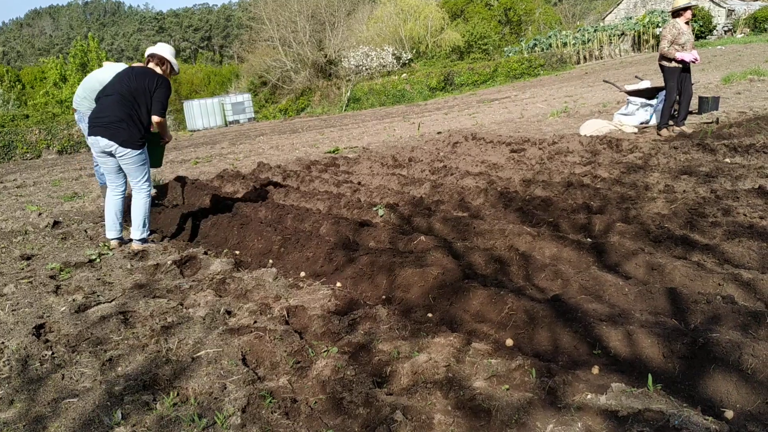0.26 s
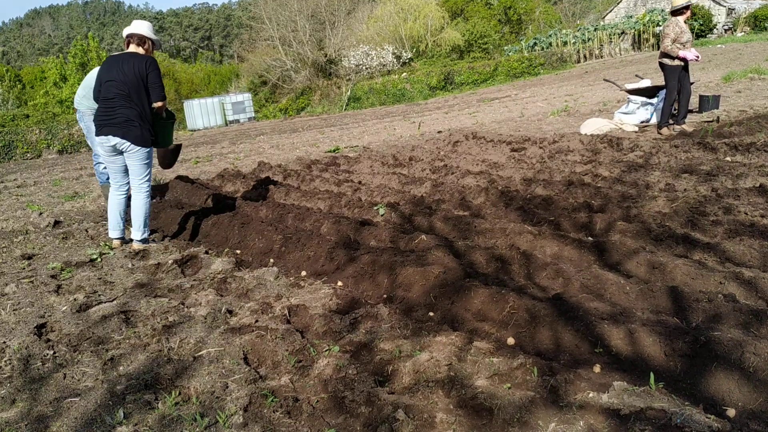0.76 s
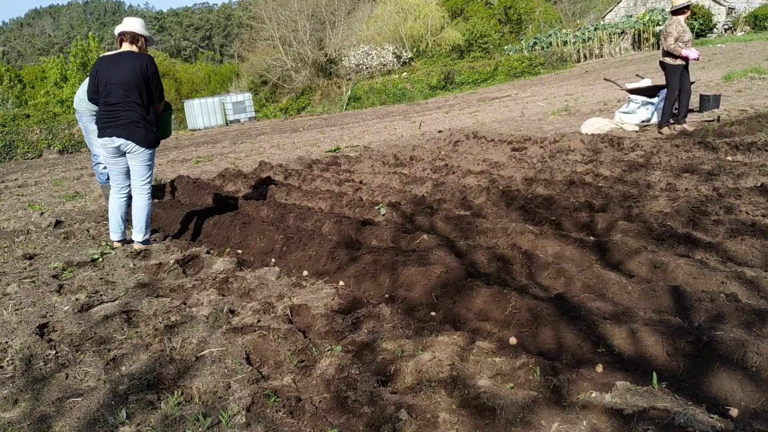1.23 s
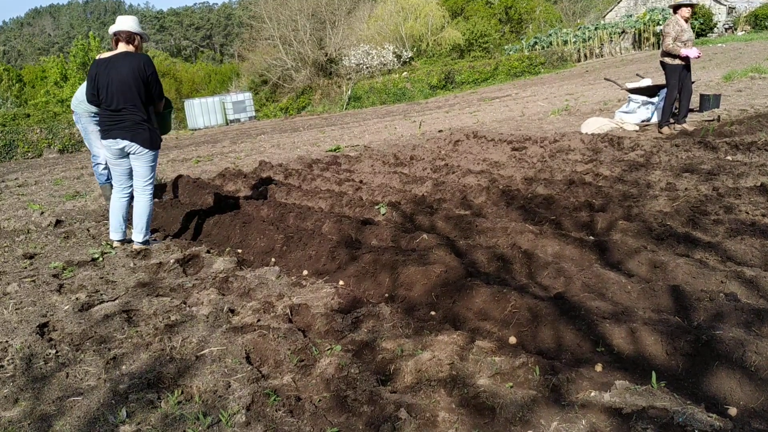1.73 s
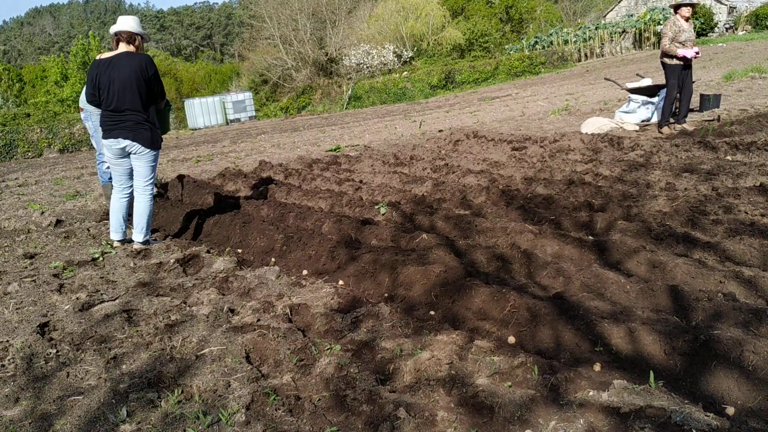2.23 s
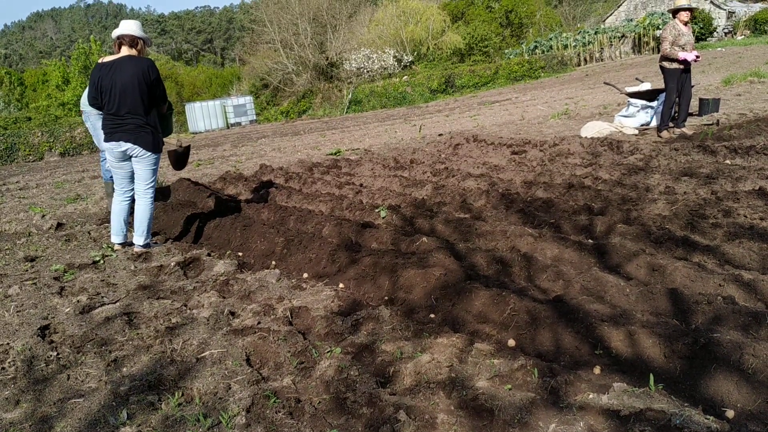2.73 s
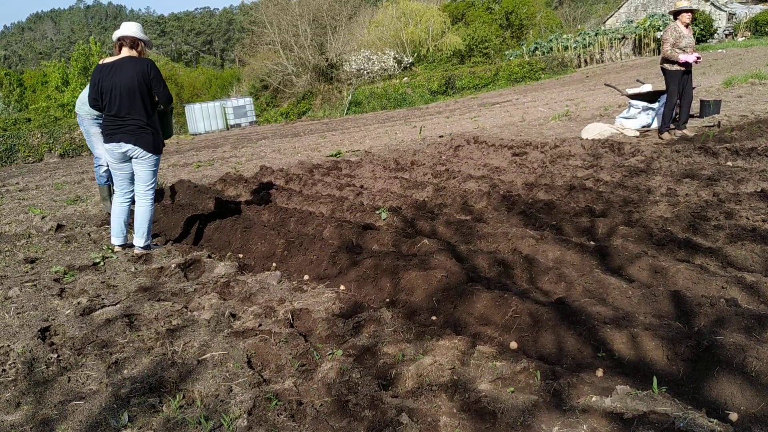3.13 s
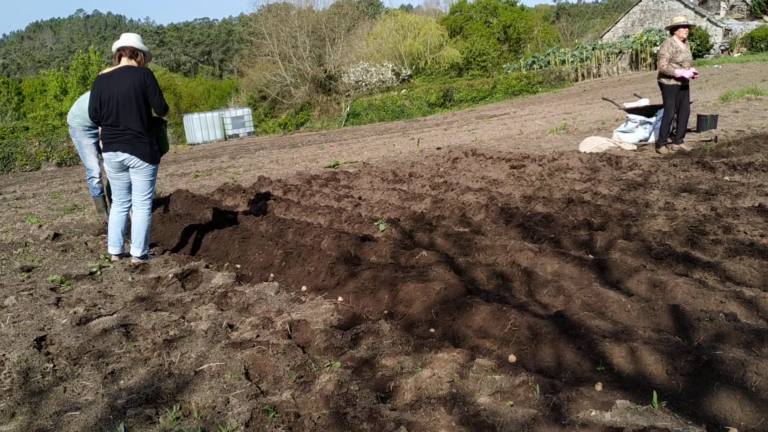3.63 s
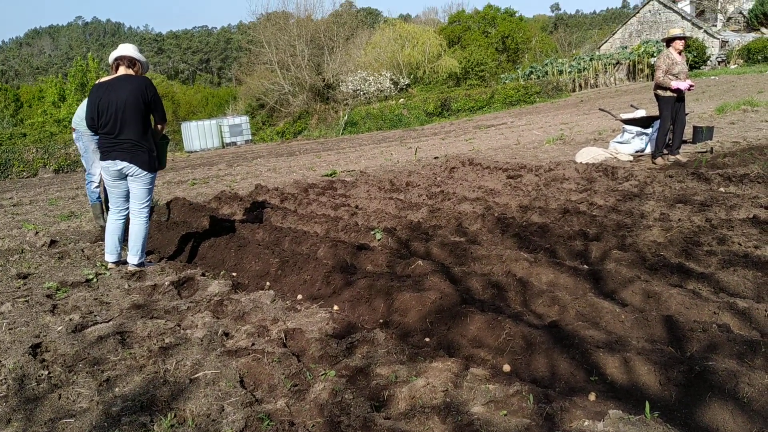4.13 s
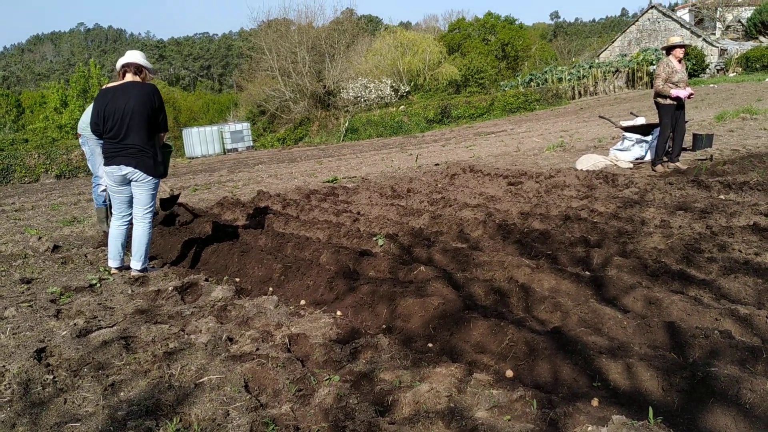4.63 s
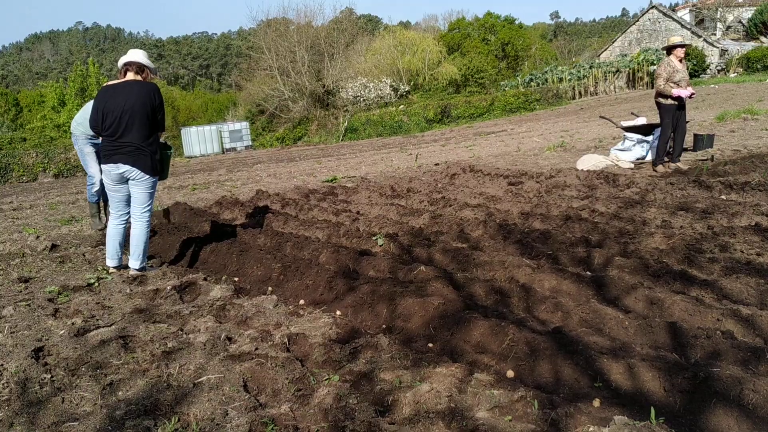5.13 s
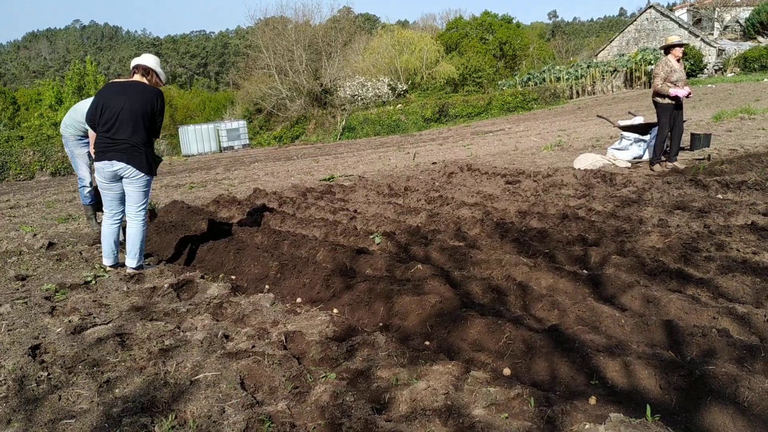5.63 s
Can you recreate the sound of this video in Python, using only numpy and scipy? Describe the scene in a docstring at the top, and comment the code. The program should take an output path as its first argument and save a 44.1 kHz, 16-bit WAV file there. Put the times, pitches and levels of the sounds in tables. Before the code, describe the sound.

Open farmland recorded on a phone with mismatched microphones: the left dull and shaded, the right bright and ringing. From the start a distant heavy diesel hums at about 80 hertz, gradually rising to 85, passing from right to left. Its deep boom is strongest in the first two seconds, dips near 2.5, partly returns, then flutters weaker toward the end. A puffing roar grows from about 1.7 seconds, with a thin panel rattle early and dull single knocks from 1.4 to 4.3. A nearby shovel enters the soil softly at 0.1, with a sharp crack and grit at 1.2, a ringing scrape at 3.2, and another bite with a short metal ping at 5.2. Leaves hiss steadily. Low wind presses on the microphones, gusting near 2.3 and most strongly around 4.5 with soft pops, and one more pop at 5.6. Very faint far bird whistles appear around 2 to 2.7 and after 5.4.

```python
"""Across an open field a six-cylinder diesel passes from right to left, far off: exhaust tones boom on the firing
rate, upper noise bursts with each firing, a loose panel rattles. Leaves hiss and wind buffets from the start; at
0.1 s a shovel first bites the soil nearby, in grit and blade modes, and again at 1.2, 3.2 and 5.2 s. Single
firings knock from 1.4 s, gliding sines make far birds from 1.9 s, wind pops follow from 4.4 s. A phone hears it
with two unlike microphone ports: the right one rings in the treble, the left one is shaded and dull."""
import sys
import numpy as np
from scipy import signal
from scipy.fft import rfft, irfft, next_fast_len
from scipy.io import wavfile
from scipy.ndimage import uniform_filter1d, map_coordinates

SR = 44100
rng = np.random.default_rng(int(sys.argv[2]) if len(sys.argv) > 2 else 0)


def unload_wav(signal):
    """Save mono or channel-first audio to the path in sys.argv[1] as 16-bit WAV at rate SR, clipped to [-1, 1]."""
    wavfile.write(
        sys.argv[1],
        SR,
        np.round(np.clip(np.atleast_2d(signal).T, -1, 1) * 32767).astype(np.int16),
    )


N = 258867
TIME = np.arange(N) / SR  # s
# resonances of the loose panel: (frequency [Hz], width [Hz], level [dB])
PANEL_MODES = [(2650, 350, -3), (3740, 500, 0), (6250, 800, -3.5), (7760, 790, -8.5)]
NEAR_LAG_MS = 0.26  # sounds from the right port's side reach the left port this much later


def amp(db):
    """dB to gain."""
    return 10 ** (np.asarray(db) / 20)


def unit(x):
    """Scaled to rms 1."""
    return x / np.sqrt(np.mean(x ** 2, axis=-1, keepdims=True) + 1e-20)


def along(points, hz):
    """Interpolates (Hz, value) points on a log frequency axis."""
    f, v = np.transpose(points)
    return np.interp(np.log(hz + 1), np.log(f + 1), v)


def curves(rows):
    """One value per sample for each column after the time."""
    s, *columns = np.transpose(rows)
    return [np.interp(TIME, s, column) for column in columns]


def wobble(rate):
    """A smooth random curve, rate knots a second."""
    coarse = TIME[::64]
    knots = rng.standard_normal(int(N * rate / SR) + 4)
    return np.interp(TIME, coarse, map_coordinates(knots, [coarse * rate]))


def filtered(x, response):
    """x times a response of frequency."""
    m = next_fast_len(N + 8192)
    return irfft(rfft(x, m) * response(np.fft.rfftfreq(m, 1 / SR)), m)[..., :N]


def rush(spectrum, patchy_db, channels):
    """Independent shaped noises of rms 1; if patchy, they share patches of random gain in time and frequency."""
    noise = rng.standard_normal((channels, N + 512))
    if patchy_db:
        z = signal.stft(noise, nperseg=512)[2]
        field = uniform_filter1d(rng.standard_normal(z.shape[1:]), size=5, axis=0)
        field = uniform_filter1d(field, size=10, axis=1)
        noise = signal.istft(z * amp(patchy_db * field / field.std()), nperseg=512)[1]
    return unit(filtered(noise[:, :N], lambda hz: amp(along(spectrum, hz))))


def crossfaded(x, edges_hz, levels_db):
    """Splits x at the edges and plays each band, at rms 1, along its own level curve."""
    under = [filtered(x, lambda hz: 1 / (1 + (hz / edge) ** 6)) for edge in edges_hz] + [x]
    return sum(amp(db) * unit(whole - lower) for db, whole, lower in zip(levels_db, under, [0] + under))


def ringing(x, modes):
    """x through resonances of (Hz, width Hz, dB) with alternating sign, at rms 1."""
    def response(f):
        return sum((-1) ** k * amp(db) * 1j * f * width / (centre ** 2 - f * f + 1j * f * width)
                   for k, (centre, width, db) in enumerate(modes))
    return unit(filtered(x, response))


def struck(db, hz, t60):
    """A sine that starts within about a millisecond and decays by 60 dB in t60 seconds."""
    t = TIME[:SR // 2]
    return amp(db - 60 * t / t60) * (1 - np.exp(-t / 0.0011)) * np.sin(2 * np.pi * hz * t)


def heard(x, lag_ms):
    """One sound at both ports, the left one late by lag_ms."""
    return np.array([map_coordinates(x, [(TIME - lag_ms / 1000) * SR], mode="nearest"), x])


def add(track, s, sound):
    """Lays a short sound on a track at s seconds."""
    part = track[..., round(s * SR):][..., :sound.shape[-1]]
    part += sound[..., :part.shape[-1]]


def engine():
    """Its tones, bark, clatter and upper roar follow one count of firings; knocks come at their own times."""
    # engine speed: (time [s], firing rate [Hz])
    firing_rate = [(0.0, 80.51), (0.33, 80.76), (0.65, 79.18), (0.98, 79.78), (1.3, 80.59), (1.63, 80.86),
                   (1.96, 81.06), (2.28, 81.14), (2.61, 81.01), (2.94, 80.97), (3.26, 81.43), (3.59, 81.13),
                   (3.91, 82.72), (4.24, 82.86), (4.57, 83.04), (4.89, 83.8), (5.22, 85.16), (5.54, 84.51),
                   (5.87, 85.15)]
    # passage from right to left: (time [s], lag of the left port behind the right [ms])
    bearing = [(0, 0.39), (1.499, 0.21), (3, -0.044), (4.199, -0.15), (5.87, -0.3)]
    hunt_hz = 0.12  # scale of the random wander in firing rate
    start_turn, burst_lead = 0.36, 0.12  # in firings
    firing_hz, lag_ms = curves(firing_rate)[0], curves(bearing)[0]
    firings = np.cumsum(firing_hz + hunt_hz * wobble(6)) / SR + start_turn
    turn = 2 * np.pi * firings
    bursts = firings + burst_lead
    count, phase = bursts.astype(int), bursts % 1
    every_other = np.cos(np.pi * count)
    # some firings are much harder than others
    strength = amp(1.6 * rng.standard_normal(1000)[count] + 2.1 * every_other + 1.6 * np.cos(turn / 6))
    direct = np.sqrt(2) * exhaust_tones(turn) + pipe_bark(strength, phase)
    direct += panel_clatter(count, every_other, phase) + loud_firings()
    return heard(direct, lag_ms) + exhaust_roar(strength, phase, lag_ms)


def exhaust_tones(turn):
    """Harmonics of the firing rate, and weaker orders in sixths of it because the cylinders are uneven."""
    # firing-rate boom: (time [s], level [dB])
    boom = [(0.1, -17.5), (0.85, -17), (1.02, -15), (1.78, -16.5), (1.86, -18.5), (2.13, -18.5),
            (2.4, -25.5), (2.46, -29), (2.78, -21.5), (3.15, -22), (3.39, -20), (3.86, -18.5),
            (4.62, -22.5), (4.74, -25.5), (4.81, -24), (4.93, -26), (5.16, -21.5), (5.3, -22), (5.49, -24),
            (5.538, -29.5), (5.566, -21.5), (5.596, -27.5), (5.64, -26), (5.738, -24.5), (5.77, -29),
            (5.8, -23.5), (5.836, -31.5), (5.87, -26)]
    # second harmonic before its waver: (time [s], level [dB])
    second = [(0, -55), (1.0, -53.5), (1.5, -46.5), (2.0, -51.5), (2.4, -41), (2.66, -34.5), (2.9, -41),
              (3.05, -32), (3.35, -34), (3.55, -38), (3.62, -49), (3.77, -38), (3.86, -45), (3.92, -35),
              (4.3, -35.5), (4.72, -33.5), (4.82, -39), (5.05, -43.5), (5.25, -41.5), (5.45, -40.5),
              (5.55, -50), (5.73, -37), (5.87, -45)]
    # higher harmonics before their waver: (time [s], third harmonic [dB], seventh harmonic [dB])
    third_seventh = [(0, -56, -52), (1.0, -51, -52.5), (1.7, -54.5, -60), (2.7, -47, -55.5),
                     (3.4, -49.5, -51.5), (4.1, -54, -57), (5.2, -58, -63), (5.87, -53, -66)]
    # uneven cylinders: (multiple of a sixth of the firing rate [1], level before swells [dB],
    # strongest time [s], distance from it in time to 6 dB down [s])
    uneven = [(3.04, -44, 3.8, 3.5), (3.96, -48.5, 4.5, 5), (4.99, -44.5, 3.1, 2.5), (7.01, -49, 4, 1),
              (8.965, -44.5, 2.8, 3), (9.96, -47, 5, 4.5), (11.08, -50, 4.6, 4.5), (14, -49, 5.5, 1.3),
              (15, -51.5, 3.6, 2), (25.94, -52, 5.36, 0.4), (27.97, -50, 4.15, 1.5),
              (29.8, -52.5, 5.03, 0.4), (33.97, -55.5, 3.3, 2.5), (35.9, -59, 3.4, 1.5),
              (48, -59.5, 3.9, 0.5), (58, -59.5, 2.8, 1)]
    waver_db, swell_db = 2, 2.5
    blur_rad = 0.046  # scale of the phase wander, per multiple
    overtones_db = [db + waver_db * wobble(9) for db in curves(second) + curves(third_seventh)]
    levels_db = curves(boom) + overtones_db
    tones = sum(amp(db) * np.cos(k * turn) for k, db in zip((1, 2, 3, 7), levels_db))
    for k, db, s, far_s in uneven:
        level_db = db - 6 * ((TIME - s) / far_s) ** 2 + swell_db * wobble(2.95)
        angle = k * (turn / 6 + blur_rad * wobble(12)) + rng.uniform(0, 2 * np.pi)
        tones += amp(level_db) * np.cos(angle)
    return tones


def exhaust_roar(strength, phase, lag_ms):
    """Broad noise whose upper part puffs with each firing and arrives partly scattered at the ports."""
    # roar before its bands are levelled: (frequency [Hz], relative density [dB])
    spectrum = [(40, -120), (60, -10), (95, -7), (130, 4.5), (200, -2), (260, -12), (320, -15.5),
                (385, -17), (480, -15), (620, -18), (790, -13.5), (950, -17.5), (1450, -19.5), (2000, -29),
                (4000, -42), (7000, -120)]
    # low end of the roar: (time [s], rumble [dB], pipe resonance [dB])
    low_end = [(0, -51, -50.5), (.8, -53, -48.5), (1.3, -45, -49), (1.7, -39.5, -50.5), (2.4, -48, -48.5),
               (3.2, -41.5, -47), (4, -44, -48.5), (4.8, -41.5, -49.5), (5.3, -44, -48), (5.87, -42, -40)]
    # upper roar along the pass: (time [s], body [dB], bright part [dB])
    passing = [(0.0, -48, -54), (0.3, -45, -49), (0.85, -50.5, -53.5), (1.2, -44.5, -52), (1.68, -44, -52),
               (1.76, -40, -49), (1.93, -42, -46.5), (2.65, -42.5, -51), (2.89, -42, -46.5),
               (3.3, -46.5, -50), (3.65, -43, -48.5), (4.07, -39.5, -46), (4.23, -43, -44),
               (4.5, -40.5, -47), (4.68, -44.5, -47.5), (5.0, -44.5, -52), (5.33, -43, -47.5),
               (5.87, -47.5, -52)]
    puffs = unit(uniform_filter1d(1.4 + strength * np.exp(-phase / 0.59), size=40))
    direct, *scattered = rush(spectrum, patchy_db=1.0, channels=3)

    def share(hz):
        """Trees and ground scatter the shorter waves, so they differ from port to port."""
        return np.clip(along([(200, 0.12), (600, 0.3), (1500, 0.74), (3000, 0.64)], hz), 0, .8)

    upper = filtered(direct, lambda hz: 1 / (1 + (440 / (hz + 1)) ** 6))
    direct = direct - upper + puffs * upper  # the low end does not puff
    sound = heard(filtered(direct, lambda hz: np.sqrt(1 - share(hz) ** 2)), lag_ms)
    sound += filtered(np.array(scattered), share)
    return crossfaded(sound, [270, 440, 1100], curves(low_end) + curves(passing))


def firing_spray(phase, decay):
    """A burst of noise at each firing, decaying over a fraction of the firing interval."""
    return rng.standard_normal(N) * np.exp(-phase / decay)


def pipe_bark(strength, phase):
    """Each firing's noise burst rings in the resonances of the exhaust pipe."""
    # bark: (time [s], level [dB])
    bark = [(0, -56), (1.1, -55.5), (1.75, -45), (2.2, -48.5), (2.5, -51.5), (2.9, -46.5), (3.3, -55),
            (4.1, -49), (4.7, -62), (5.87, -62)]
    # pipe resonances: (frequency [Hz], width [Hz], level [dB])
    pipe_modes = [(520, 180, -6), (792, 250, 0.5), (1080, 450, -1.5), (1590, 400, -8.5)]
    return amp(curves(bark)[0]) * ringing(strength * firing_spray(phase, decay=0.16), pipe_modes)


def panel_clatter(count, every_other, phase):
    """Each firing shakes the loose panel, whose resonances ring on a noise burst."""
    # clatter: (time [s], level [dB])
    clatter = [(0, -58), (.5, -57.5), (1.1, -60.5), (1.4, -55.5), (1.6, -49.5), (1.8, -57.5), (2.3, -59.5),
               (3, -70), (5.87, -78)]
    shakes = amp(2.4 * rng.standard_normal(1000)[count] + 3.2 * every_other)
    return amp(curves(clatter)[0]) * ringing(shakes * firing_spray(phase, decay=0.15), PANEL_MODES)


def leaves():
    """Leaves hiss all around: patchy noise, partly shared by the ports and partly separate at each."""
    # leaf noise before its bands are levelled: (frequency [Hz], relative density [dB])
    spectrum = [(500, -120), (900, -9), (2000, 2.5), (4000, -8), (8000, -7), (12000, -14), (16000, -14.5)]
    # leaf level: (time [s], hiss [dB], its finest part [dB])
    hiss_level = [(0.0, -47.5, -54.5), (0.88, -50.5, -56), (1.6, -47.5, -53.5), (3.22, -50.5, -60),
                  (4.2, -51, -57), (4.66, -49.5, -51.5), (5.87, -52.5, -53)]
    near, *around = rush(spectrum, patchy_db=1.84, channels=3)
    hiss = amp(0.53 * wobble(9)) * (0.67 * heard(near, NEAR_LAG_MS) + np.array(around))
    return crossfaded(hiss, [6800], curves(hiss_level))


def wind_buffet():
    """A steady breeze and gusts press low noise on the microphone ports, more on the left one."""
    # buffet noise: (frequency [Hz], relative density [dB])
    spectrum = [(3, -19.5), (10, 4), (16, 2), (24, -14), (31, -8), (45, -8), (70, -8.5), (200, -38),
                (500, -49), (1000, -120)]
    # gusts: (strongest time [s], gain added to the breeze [dB], time from there to 1/e [s])
    gusts = [(2.3, -37, 0.16), (3.1, -46, 0.43), (4.495, -29, 0.21), (5.75, -42, 0.34)]
    breeze_db = -35.5
    gain = amp(breeze_db) + sum(amp(db) * np.exp(-((TIME - s) / half_s) ** 2) for s, db, half_s in gusts)
    both, left, right = rush(spectrum, patchy_db=None, channels=3)
    return gain * np.array([both + amp(2.5) * left, both + amp(-24.0) * right])


def panel_ticks():
    """Lone ticks of the panel: its modes, slightly detuned, die away in milliseconds."""
    # ticks: (time [s], level before the mode levels [dB])
    ticks = [(0.021, -41), (.032, -39.5), (.44, -42), (.6935, -39.5), (0.769, -39.5)]
    out, t = np.zeros(N), TIME[:SR // 2]
    for s, db in ticks:
        ring = sum(amp(level) * np.sin(2 * np.pi * hz * (1 + .03 * rng.normal()) * t)
                   for hz, _, level in PANEL_MODES)
        add(out, s, amp(db - 60 * t / 0.012) * ring)
    return out


def shovel():
    """The edge cracks, spiky grit sings in the blade's high modes, and a thud rings in its low ones."""
    # strokes in the soil: (time [s], level [dB], edge crack [dB], rise constant [ms], grit decay [ms],
    # grit from [Hz], grit to [Hz], thud [dB], ring [dB], sings most near [Hz], and near [Hz]);
    # crack, thud and ring are relative to the level
    strokes = [(.096, -44, -17, 3, 45, 1200, 3800, -6, -13, 3300, 6000),
               (1.1999, -34, 18, 1.1, 6.4, 3280, 15000, 6, 0, 6010, 4800),
               (1.223, -46, 7, .4, 2.5, 4940, 8300, 9, 2.5, 6850, 6850),
               (3.1902, -37.5, -5, 2.1, 6.4, 1500, 14000, -5, 4, 3620, 7500),
               (5.158, -41, -20, 4, 18, 600, 2200, -6, -20, 3300, 3300),
               (5.239, -35, 10, 1.1, 6.2, 3580, 14500, -18, 1, 6950, 3880)]
    # low blade modes: (frequency [Hz], level before random variation [dB], 60 dB decay [s])
    low_modes = [(348, -1, 0.075), (690, -2.5, 0.058), (1087, -0.5, 0.074), (1330, -1.5, 0.079),
                 (1590, -2.5, 0.045), (2000, -7, 0.06)]
    # high blade modes: frequency [Hz]
    high_modes = [3320, 3630, 4100, 4870, 5940, 6930, 7450, 8360, 10100, 11850]
    sing_falls_db_per_octave = 40
    crack_hz, crack_ms = 7300, 0.34
    out, t = np.zeros(N), TIME[:SR // 6]
    ms = t * 1000
    for s, db, crack_db, rise_ms, grit_ms, low_hz, high_hz, thud_db, ring_db, *near_hz in strokes:
        spikes = amp(2 * rng.standard_normal(len(t) // 32 + 1)).repeat(32)[:len(t)]
        grit = rng.standard_normal(len(t)) * spikes
        band = signal.butter(2, [low_hz, high_hz], "bandpass", fs=SR)
        grit = unit(signal.lfilter(*band, grit))
        ring = np.zeros(len(t))
        for hz in high_modes:
            octaves_off = np.abs(np.log2(hz / np.array(near_hz))).min()
            ring += amp(-sing_falls_db_per_octave * octaves_off) * np.sin(2 * np.pi * (hz * t + rng.uniform()))
        spread = ms / grit_ms
        bite = np.exp(-spread ** 2) * (grit + amp(ring_db) * unit(ring))
        crumbs = 0.44 * np.exp(-spread / 3) * grit  # they trickle on after the bite
        thud = sum(amp(level + rng.normal(0, 1.4) - 60 * t / t60)
                   * np.sin(2 * np.pi * hz * t + rng.uniform(0, 2 * np.pi)) for hz, level, t60 in low_modes)
        crack = amp(crack_db) * np.exp(-ms / crack_ms) * np.sin(2 * np.pi * crack_hz * t)
        rise = 1 - np.exp(-ms / rise_ms)
        add(out, s, amp(db) * (crack + rise * (bite + crumbs + amp(thud_db) * thud)))
    return out


def metal_pings():
    """Thin metal pings, each a single decaying mode."""
    # pings: (time [s], level before onset and decay [dB], frequency [Hz], 60 dB decay [s])
    pings = [(0.105, -48, 5970, 0.36), (2.532, -43, 3660, 0.19), (5.181, -32.5, 1033, 0.19)]
    out = np.zeros(N)
    for s, db, hz, t60 in pings:
        add(out, s, struck(db, hz, t60))
    return out


def loud_firings():
    """Single loud firings knock, each a brief decaying sine at its own listed time."""
    # knocks: (time [s], level before onset and decay [dB], frequency [Hz])
    knocks = [(1.422, -34, 672.8), (1.738, -29, 760), (1.816, -30, 790), (1.864, -29, 920),
              (1.902, -30, 790), (1.939, -31, 1150), (1.964, -31, 950), (2.087, -26.5, 926),
              (2.677, -30, 930), (2.805, -28, 834), (2.902, -26, 727), (3.1225, -26, 790), (3.9, -31, 1250),
              (4.151, -25, 670), (4.316, -32, 690)]
    out = np.zeros(N)
    for s, db, hz in knocks:
        add(out, s, struck(db, hz, t60=0.035))
    return out


def birds():
    """Thin far whistles: faint sines that glide a little under a smooth swell."""
    # whistles: (start [s], end [s], from [Hz], to [Hz], level [dB])
    whistles = [(1.868, 1.94, 6770, 6920, -54), (2.16, 2.241, 6130, 5930, -57),
                (2.632, 2.7, 2590, 2600, -53), (2.62, 2.66, 4150, 4130, -56), (5.47, 5.53, 4180, 4130, -59),
                (5.537, 5.618, 4220, 4150, -61), (5.42, 5.538, 5150, 5020, -60),
                (5.74, 5.92, 5150, 5050, -56.5)]
    out = np.zeros(N)
    for start, end, from_hz, to_hz, db in whistles:
        hz = np.linspace(from_hz, to_hz, round((end - start) * SR))
        swell = np.sqrt(np.hanning(len(hz)))
        add(out, start, amp(db) * swell * np.sin(2 * np.pi * np.cumsum(hz) / SR))
    return out


def wind_pops():
    """Wind pops on the ports: a pressure step that swings back, with noise on its edge and a thin hiss."""
    # pops: (time [s], mean level of the ports [dB], left minus right [dB])
    pops = [(4.372, -29.5, -2), (4.394, -38, -10), (4.48, -26.5, 22.5), (4.528, -27, 15.5),
            (5.626, -34, -1.5)]
    out, t = np.zeros((2, N)), TIME[:SR // 20]
    for s, db, pan_db in pops:
        step = (1 - t / 0.002) * np.exp(-t / 0.0034)
        step += 0.22 * rng.standard_normal(len(t)) * np.exp(-t / 0.0016)
        trail = np.diff(rng.standard_normal(len(t) + 1), n=2, prepend=0)  # tilted to the treble
        step += .01 * trail * np.hanning(len(t))
        add(out, s, amp(db + pan_db * np.array([[.5], [-.5]])) * step)
    return out


def scene():
    """Everything as it arrives at the two ports; small sounds come from the right port's side."""
    small = panel_ticks() + shovel() + metal_pings() + birds()
    return engine() + leaves() + wind_buffet() + heard(small, NEAR_LAG_MS) + wind_pops()


def record(dry):
    """Each microphone port has its colour and its own electric hiss; nothing stays above the band limit."""
    # shaded, dull left port: (frequency [Hz], gain [dB])
    left_port = [(500, -1), (1300, -1.5), (2000, -4.5), (3600, -6.5), (4600, -13), (5800, -11),
                 (7000, -15.5), (10000, -19.5), (15500, -29)]
    # right port, ringing in the treble: (frequency [Hz], gain [dB])
    right_port = [(1500, -0.5), (3000, 1), (5000, 5.5), (6000, 10), (7300, 9.5), (8600, 1), (10500, -4.5),
                  (15500, -11.5)]
    top_hz = 15760
    coloured = filtered(dry, lambda hz: amp([along(left_port, hz), along(right_port, hz)]))
    # electric hiss: (frequency [Hz], relative density [dB])
    hiss_spectrum = [(1000, -3), (9000, -9.5), (13300, -4.5), (14200, -12.0), (15200, -19.0)]
    hiss = rush(hiss_spectrum, patchy_db=None, channels=2)
    return filtered(coloured + amp([[-65], [-68]]) * hiss, lambda hz: hz < top_hz)


dry = scene()
out = record(dry)
unload_wav(out)
```